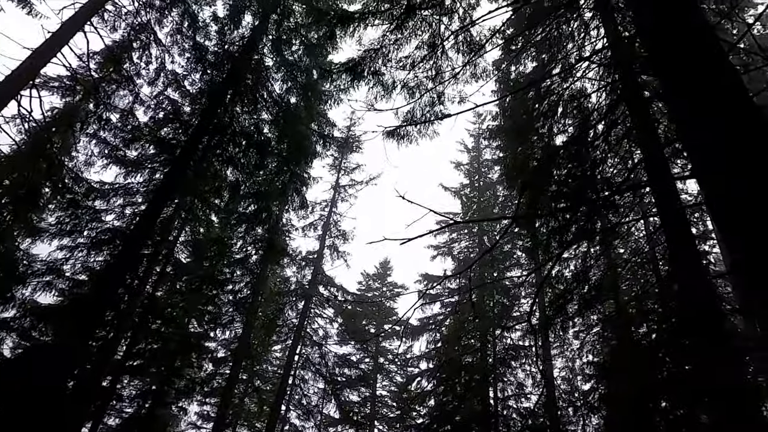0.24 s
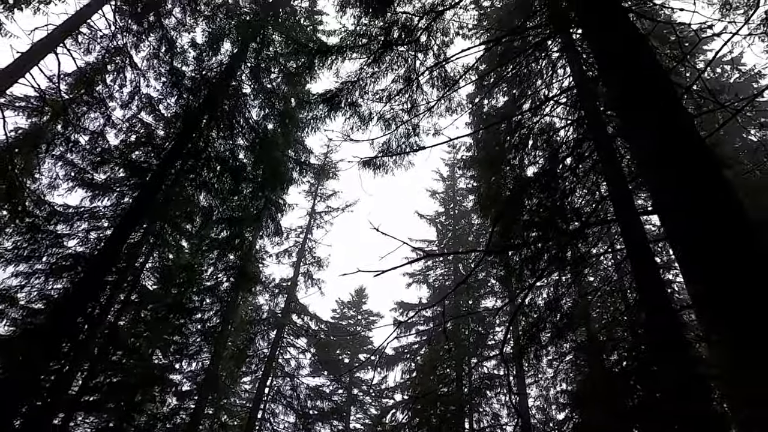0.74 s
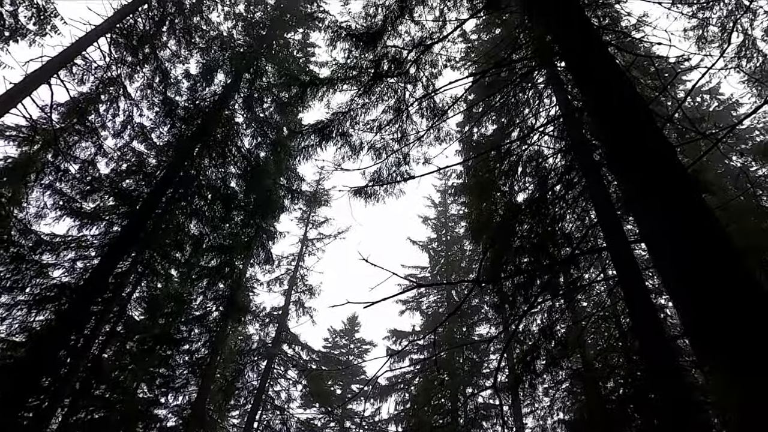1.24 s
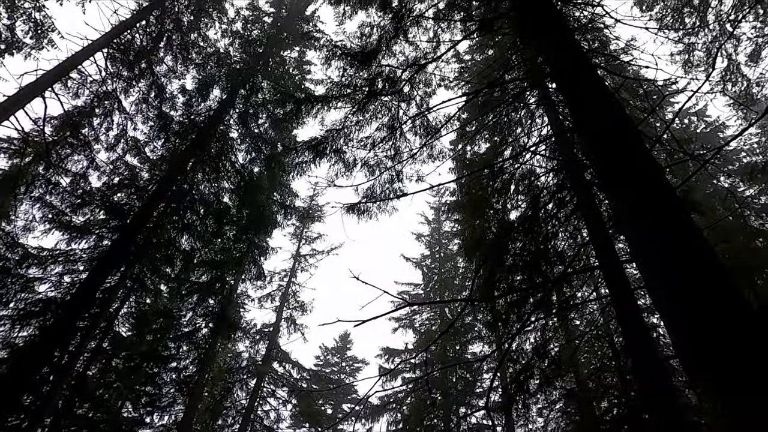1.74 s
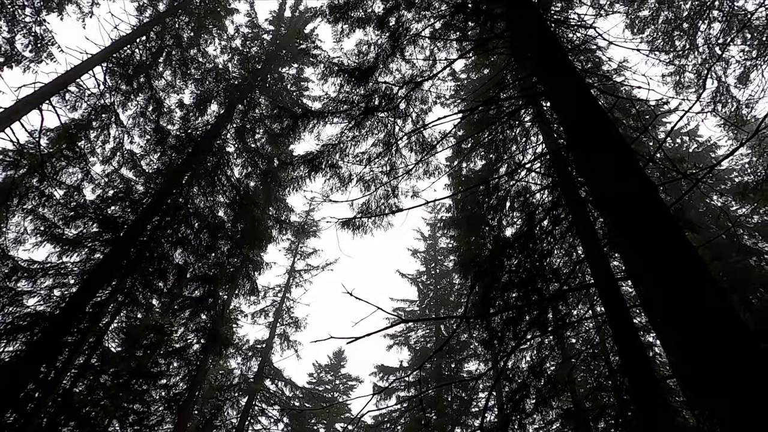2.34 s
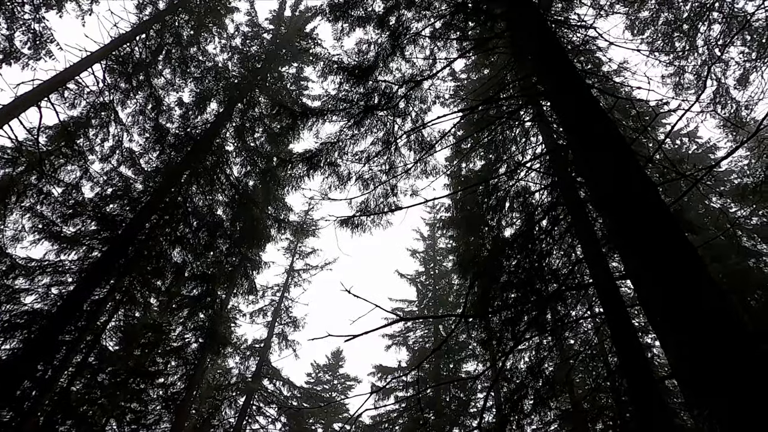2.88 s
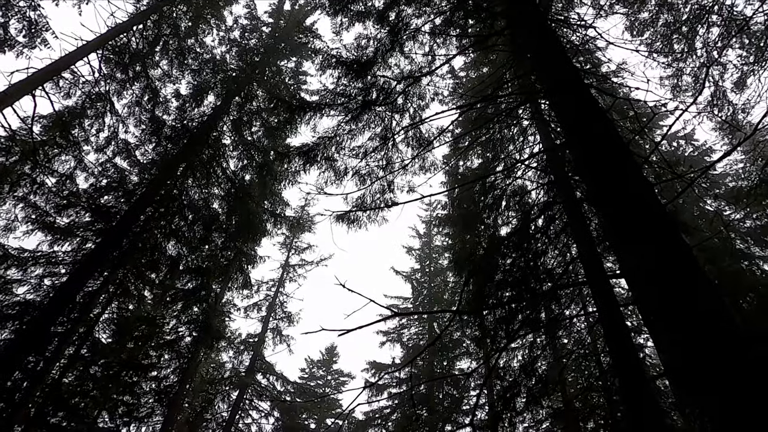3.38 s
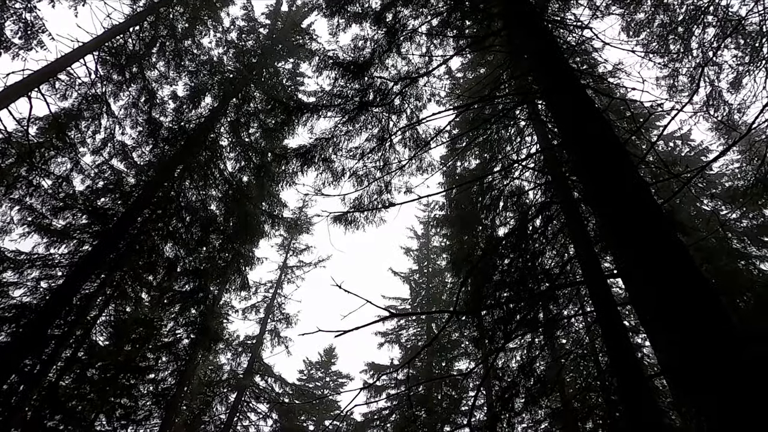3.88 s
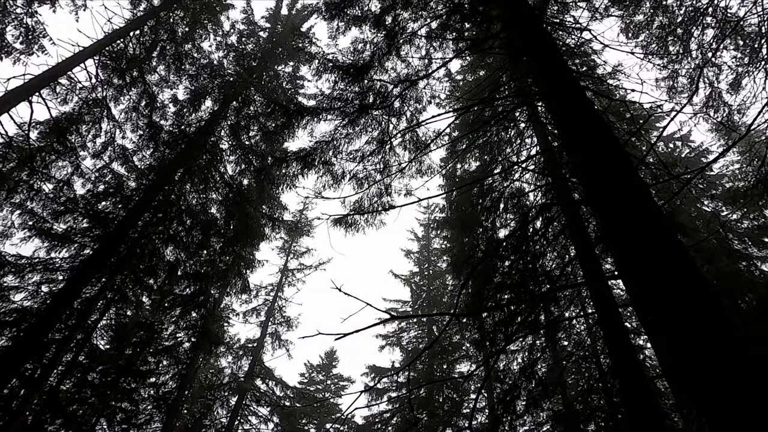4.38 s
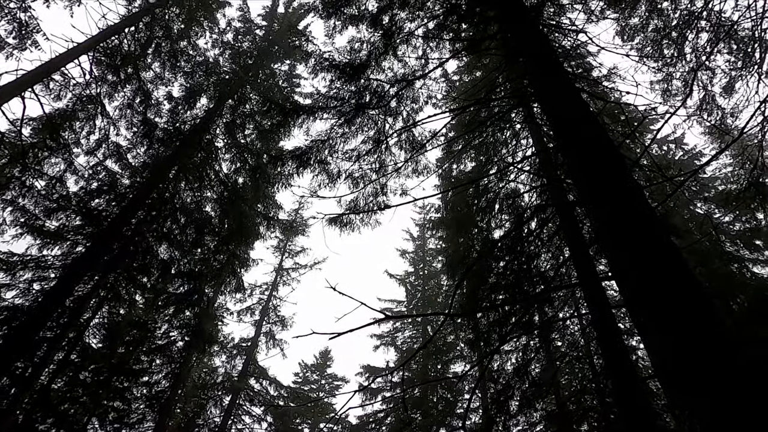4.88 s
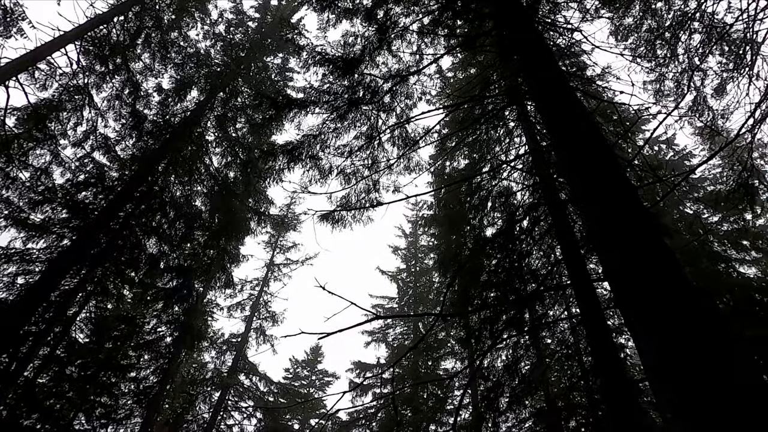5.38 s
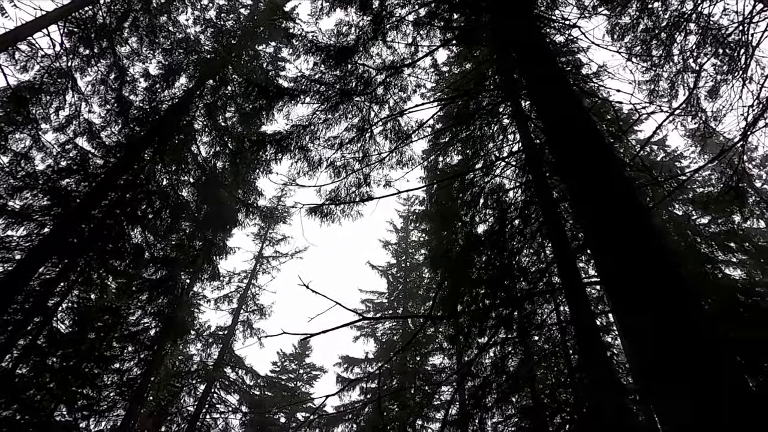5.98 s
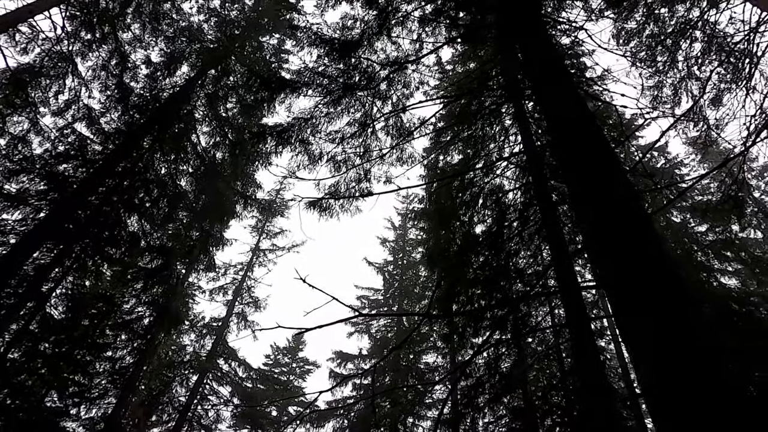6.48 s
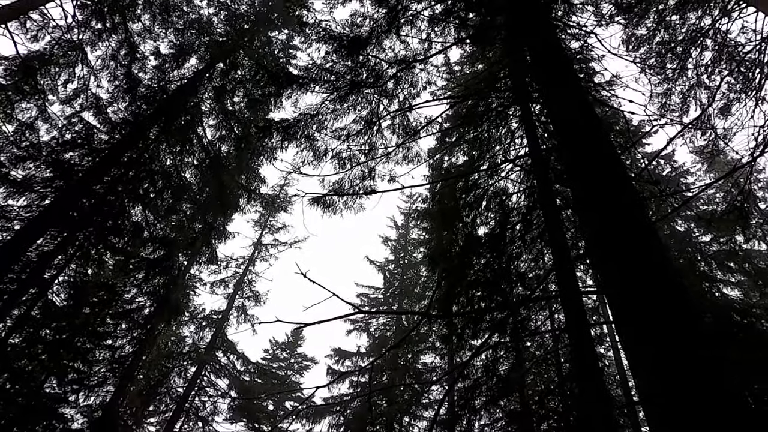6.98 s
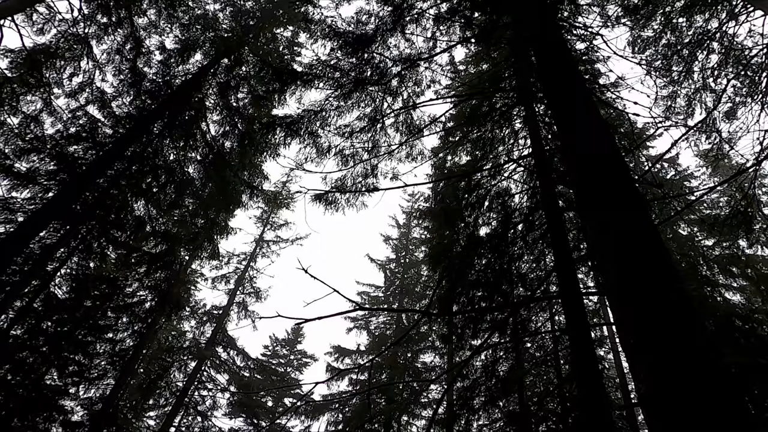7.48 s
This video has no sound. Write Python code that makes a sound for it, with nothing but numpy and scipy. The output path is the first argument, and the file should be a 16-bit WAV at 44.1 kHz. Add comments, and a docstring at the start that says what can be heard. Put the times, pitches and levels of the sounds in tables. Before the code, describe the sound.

In a quiet conifer forest, heard through a hand-held camera's microphone, the first half second is close handling: a firm hollow knock at 0.12 s, smaller bumps, grip creaks, scratchy sleeve and a little low rumble. Behind lies a very faint rush of boughs with sparse, thin, falling whistles. A soft knock and scuff come at 1.05 s, a stronger knock at 1.8 s, and tiny dry twig ticks at 1.7, 1.9, 2.6, 3.0 and 3.3 s. From about 2.4 s whistles thicken, and between 3 and 3.6 s the wind rises sharply into a high, airy hiss centred around 3.5-4.5 kHz, fluttering with short gliding whistles and growing slightly until the end at 7.7 s. Hand knocks and a soft broad slide occur around 5.5-5.9 s. At 7.39 s a loud, sharp camera click snaps with a short woodland echo; the hiss continues.

```python
"""Needles in tall spruce tops whistle as the wind rises: single thin glides crowd into a high hiss.
Each whistle is a sine gliding through an eddy's arch; far needles and boughs are fluttering coloured noise.
Close by, a sleeve rustles in scratchy clicks, and fingers knock and slide on a hand-held camera's case.
Twigs tick, and the camera clicks sharply near the end: short pushes through decaying modes."""
import sys
import numpy as np
from scipy import signal
from scipy.fft import rfft, irfft, next_fast_len
from scipy.io import wavfile
from scipy.ndimage import uniform_filter1d

SR = 44100
rng = np.random.default_rng(int(sys.argv[2]) if len(sys.argv) > 2 else 0)


def materialize(psi):
    """Save the field psi as 16-bit PCM at rate SR to the path in sys.argv[1].

    A 1-D psi becomes a single channel; in a 2-D psi each row is a channel.
    """
    bounded = np.clip(np.atleast_2d(psi).T, -1, 1)
    quanta = np.round(bounded * 32767).astype(np.int16)
    wavfile.write(sys.argv[1], SR, quanta)


N = 340893

# Wind lulls, then rises; reference level for needles and boughs: time_s, gust_db
GUST = [(0.0, -64), (0.6, -73), (1.3, -66), (2.39, -63), (2.98, -57.5), (3.57, -43.5), (7.73, -38.5)]
# Rush of the boughs against the gust: gust_db, bough_level_db
BOUGH_LAW = [(-75.5, -63.5), (-64.5, -60.5), (-57.5, -55), (-40.5, -51)]
# Puffs through single crowns: middle_s, length_s, added_hiss_db (relative to the gust)
PUFFS = [(5.14, 0.13, -12.5), (6.12, 0.3, -17.5), (6.77, 0.079, -8.5), (7.19, 0.166, -10.5)]
# Finest needles set hissing higher by the gust front: middle_s, length_s, level_db
FINE_PUFFS = [(3.55, 0.13, -67.5), (3.95, 0.145, -56.5), (4.27, 0.19, -63), (4.9, 1, -58)]
# Relative spectrum shapes: frequency_hz, density_db (per Hz)
NEEDLE_COLOUR = [(1800, -39.5), (2400, -14.5), (3000, -7), (3700, -2), (4500, -4), (5200, -11), (6200, -20),
                 (7800, -31), (9000, -42), (14000, -68.5)]
FINE_COLOUR = [(3500, -25), (5000, 2), (5800, 7.5), (7000, -9.5), (8500, -32.5), (14000, -60)]
BOUGH_COLOUR = [(25, -31), (85, -82.5), (120, -12), (170, 1.5), (500, 1), (800, 3), (1200, 5), (2000, 1.5),
                (4500, -8.5), (6500, -17.5), (8400, -27), (9500, -24.5), (12000, -32.5), (14000, -53)]
SLIDE_COLOUR = [(70, -39), (170, -2), (450, 4), (630, -1.5), (950, 8), (1280, 9.5), (2000, 7), (4000, 4),
                (7000, -3.5), (8700, -13.5), (10500, -17), (13000, -28), (15000, -41)]
RUMBLE_COLOUR = [(20, -15), (35, 1.5), (60, -5), (120, -4), (190, -3.5), (400, -56.5)]
# Nearby sprays: start_s, length_s, pitch_hz, glide (share of pitch), arch (share of pitch), level_db
WHISTLES = [(0, 0.13, 4388, -0.106, 0.013, -70), (.185, .12, 3936, -.22, 0.017, -72.5),
            (.52, 0.087, 3080, -.08, 0.012, -78), (.698, 0.161, 4044, -0.02, 0.185, -72),
            (1.21, 0.13, 3874, 0, -0.0089, -75.5), (1.365, 0.044, 5300, -0.084, 0.024, -73.5),
            (1.396, 0.12, 4220, -.14, 0.039, -68.5), (1.675, 0.063, 3162, 0.01, 0.037, -68.5),
            (1.95, 0.125, 3674, 0.065, 0.065, -62), (2.047, 0.079, 4427, -0.18, 0.067, -68.5),
            (2.096, 0.0536, 3397, -0.016, -0.0064, -68), (2.361, 0.12, 3970, -0.027, 0.016, -67),
            (2.372, 0.079, 3230, -0.212, 0.07, -64), (2.412, 0.047, 4690, -0.048, 0.0063, -65),
            (2.462, 0.059, 4400, -0.068, 0.0029, -65.5), (2.635, 0.115, 4670, -0.015, -0.02, -61),
            (2.725, .07, 3850, -0.069, -0.015, -63.5), (2.915, 0.0735, 3275, -0.044, 0.022, -57.5),
            (2.905, 0.14, 6320, 0.064, 0.0097, -67), (3.02, 0.136, 3536, -0.062, 0.021, -52),
            (3.072, 0.049, 4000, -0.047, -0.0053, -48), (3.108, 0.056, 3955, -0.13, -0.011, -48),
            (3.12, 0.04, 4770, -0.053, -0.001, -58), (3.15, .05, 3753, -.07, -0.015, -45),
            (3.185, 0.078, 3620, 0.017, 0, -56), (3.19, 0.145, 4467, -0.068, -0.0085, -56.5),
            (3.461, 0.12, 3340, 0.107, -0.032, -51.5), (3.47, 0.08, 6370, .06, -0.0022, -68),
            (3.516, 0.1136, 3806, -0.125, -0.026, -48.5), (3.52, 0.092, 5350, 0.018, 0.034, -57.5),
            (3.6, 0.129, 3735, -0.013, 0.017, -48), (3.68, 0.1223, 3623, -0.0244, 0.0184, -41),
            (3.855, 0.1355, 3531, -0.084, 0.09, -44.5), (4.0, 0.084, 5436, 0.0049, -0.028, -55),
            (4.1, 0.077, 3772, 0.125, 0, -52.5), (4.145, 0.078, 4350, -0.106, 0.172, -55.5),
            (4.31, 0.063, 4490, 0.043, -0.0084, -49.5), (4.435, 0.06, 3714, 0.049, 0.0022, -51),
            (4.49, 0.08, 4870, -0.172, 0.001, -53), (4.725, 0.104, 3700, -0.0236, -0.00091, -43),
            (4.765, .08, 8170, 0.0094, 0.03, -71), (4.94, 0.074, 3454, 0.089, -0.039, -47),
            (4.949, .085, 4575, 0.119, .015, -51.5), (5.09, 0.096, 3666, 0.0083, -0.0086, -48.5),
            (5.17, 0.047, 4750, -0.049, -0.0062, -55), (5.22, 0.141, 3910, -0.095, -0.014, -45),
            (5.395, 0.039, 9250, -0.035, -0.022, -68), (5.565, 0.138, 3820, -.13, 0.0041, -47),
            (5.6, 0.071, 5220, 0.105, -0.0073, -51), (5.83, 0.04, 4304, -0.19, 0.033, -46.5),
            (5.989, 0.107, 4674, -0.119, 0.015, -48.5), (6.06, 0.145, 3622, -0.049, 0.017, -46),
            (6.12, 0.0784, 4416, 0.102, 0.0022, -44), (6.135, 0.12, 3345, 0.144, 0.008, -48),
            (6.26, 0.051, 8670, -0.085, 0.0084, -71), (6.41, 0.0764, 3788, 0.12, 0.025, -43.5),
            (6.49, 0.094, 3667, 0.07, -0.034, -43.5), (6.56, 0.09, 4173, 0.063, 0.0048, -48.5),
            (6.88, 0.059, 7930, -0.049, 0.011, -65), (6.92, 0.071, 3445, -0.0031, -0.013, -48.5),
            (7.105, 0.109, 4387, 0.096, 0.014, -44.5), (7.53, 0.0737, 3568, 0.09, -0.0099, -45),
            (7.62, 0.11, 3620, -0.167, 0.0062, -45.5)]
# Whole branches stirred by an eddy: start_s, length_s, pitch_hz, spread (share of pitch), level_db
FLURRIES = [(1.328, 0.145, 4770, 0.109, -69.5), (1.9, 0.084, 4600, 0.109, -67.5),
            (2.554, 0.198, 4422, 0.096, -58), (2.701, 0.205, 4294, 0.123, -60.5),
            (2.851, 0.183, 3069, 0.0915, -57), (3.039, .2, 4146, .12, -52.5), (3.189, .26, 4448, .11, -54),
            (3.389, 0.191, 3149, 0.088, -51)]
# Sleeve as the camera is raised: middle_s, length_s, level_db
RUSTLES = [(.165, 0.079, -62), (.27, 0.126, -64), (.42, 0.098, -67)]
# Hand sliding on the case: middle_s, length_s, level_db
SLIDES = [(0.1695, 0.179, -65), (0.404, 0.048, -63.5), (1.051, 0.5, -66), (5.736, 1, -48),
          (5.59, 0.111, -52.5)]
# Skin sticking and slipping as the grip tightens, before the high-pass: middle_s, length_s, level_db
SQUEEZES = [(.122, 0.0208, -42.5), (.25, 0.158, -56.5)]
# Camera jolts as it is swung upward: middle_s, level_db
JOLTS = [(.03, -72), (.18, -59.5), (.5, -66.5), (.71, -73.5), (.92, -70), (1.85, -64.5)]
# Knocks on the case, before the high-pass: start_s, peak_db, push_hz, abruptness (0-2)
KNOCKS = [(.056, -46.5, 298, 0.62), (.115, -40.5, 420, 0.8), (.120, -19, 928, 0.198),
          (.133, -40, 1000, 0.62), (.165, -38, 420, 0.46), (.177, -42.5, 450, 1), (.219, -37, 597, 0.55),
          (.242, -49, 640, 0.44), (.256, -48, 520, 0.43), (.271, -46.5, 603, 0.7), (.361, -43, 450, 0.304),
          (1.046, -31, 660, 0.523), (1.052, -41, 900, 0.96), (1.787, -22, 762, 0.577), (2.472, -45, 318, 1),
          (5.512, -33.5, 313, 0.71), (5.568, -25.5, 848, 0.64), (5.624, -29.5, 450, 0.81),
          (5.633, -35, 700, 0.37), (5.815, -35, 235, 0.414), (5.826, -43.5, 237, 0.91),
          (7.393, -27, 348, 0.56), (7.402, -37, 346, 0.275)]
# Twig ticks, then the camera's sharp click (last two rows), before high-pass and echo:
# start_s, peak_db, push_hz, abruptness (0-2)
TICKS = [(.054, -53, 6500, 0.19), (.122, -44.5, 4970, 0.68), (.177, -46, 2330, 0.15),
         (1.681, -46.5, 5440, 0.226), (1.925, -48, 5950, 0.235), (2.561, -47.5, 5400, 0.58),
         (3.026, -43, 6740, 0.364), (3.305, -48.5, 7730, 0.73), (7.3927, -12.5, 3665, 0.87),
         (7.3938, -21.5, 3300, 0.61)]
# Modes of the case, and of the ticks and click: frequency_hz, relative_db, t60_s (before the choke)
CASE_MODES = [(254, 10, 0.0052), (450, 16, 0.00688), (640, 3, 0.0773), (807, -2, 0.0143), (1061, -4, 0.031),
              (1177, -7, 0.058), (1304.4, 9.5, 0.0274), (1983, -4, 0.05)]
TICK_MODES = [(2780, 10, 0.00336), (3550, 8, 0.0044), (6000, 3.5, 0.00183), (7727, 2, 0.00397)]

FLUTTER_DB, FLUTTER_PER_S = 0.7571, 14  # random surge and sag of the hiss
CREST_SKEW = 0.6485  # below 1: an eddy speeds up faster than it dies, so the arch crests early
STRAND_S, FLURRY_ATTACK_S, FLURRY_RELEASE_S = 0.04, 0.01, 0.048
JOLT_LENGTH_S, CHOKE_S = 0.1274, 0.026


def undb(db):
    """Decibels to gain."""
    return 10 ** (np.asarray(db) / 20)


def unit(x):
    """Scale to an rms of one."""
    return x / np.sqrt(np.mean(x ** 2))


def butter(x, order, hz, kind):
    """Butterworth filter."""
    return signal.sosfilt(signal.butter(order, hz, kind, fs=SR, output="sos"), x)


def curve(rows):
    """Rows of (time_s, value) joined by straight lines."""
    return np.interp(np.arange(N) / SR, *np.transpose(rows))


def colour_db(points, hz):
    """Read a spectrum on a log-frequency axis."""
    point_hz, db = np.transpose(points)
    return np.interp(np.log(np.maximum(hz, 1)), np.log(point_hz), db)


def walk(rate_per_s, size=N):
    """Smooth random wandering with a spread near one."""
    k = max(int(SR / rate_per_s), 2)
    steps = np.repeat(rng.standard_normal(size // k + 2), k)
    smooth = uniform_filter1d(uniform_filter1d(steps, k), k)
    return np.sqrt(2) * smooth[:size]


def add(out, start_s, sound):
    """Mix a sound in at a time, cutting what falls outside."""
    i = int(start_s * SR)
    lo, hi = max(i, 0), min(i + len(sound), len(out))
    if hi > lo:
        out[lo:hi] += sound[lo - i:hi - i]


def swells(events):
    """A bell of gain per (middle_s, length_s, level_db); length is taken at half height."""
    t = np.arange(N) / SR
    gain = np.zeros(N)
    for middle_s, length_s, db in events:
        octaves_down = np.minimum((2 * (t - middle_s) / length_s) ** 2, 20)
        gain += undb(db) * np.exp2(-octaves_down)
    return gain


def turbulence(points, flicker_db, flicker_per_s, count=18):
    """Coloured noise whose half-octave bands each flutter in level."""
    size = next_fast_len(N, True)
    hz = np.arange(size // 2 + 1) * SR / size
    spectrum = rfft(rng.standard_normal(size)) * undb(colour_db(points, hz))
    band = np.clip(2 * np.log2(np.maximum(hz, 1) / 32), 0, count - 1).astype(int)
    out = np.zeros(N)
    for k in range(count):
        noise = irfft(spectrum * (band == k), size)[:N]
        out += noise * undb(flicker_db * walk(flicker_per_s))
    return unit(out)


def forest(x, wet_db, t60_s, build_s=0.073):
    """Trunks scatter a thin echo that builds up, then fades."""
    t = np.arange(SR) / SR
    echo = rng.standard_normal(SR) * undb(-60 * t / t60_s) * (1 - np.exp(-t / build_s))
    return x + undb(wet_db) * signal.fftconvolve(x, echo / np.linalg.norm(echo))[:N]


def boughs(gust_db):
    """The rush of the boughs grows with the wind more slowly than the needles' hiss."""
    level_db = np.interp(gust_db, *np.transpose(BOUGH_LAW))
    return undb(level_db) * turbulence(BOUGH_COLOUR, flicker_db=1.3, flicker_per_s=13)


def sleeve(catches_per_s=900, low_hz=1600, high_hz=3000):
    """Threads of cloth catch and let go in a scratchy run of tiny clicks."""
    catches = (rng.random(N) < catches_per_s / SR) * rng.standard_normal(N) * undb(2 * walk(59.9))
    scratch = butter(catches, 3, [low_hz, high_hz], "bandpass")
    return swells(RUSTLES) * unit(scratch)


def ring(modes):
    """Fading tones of a struck object, choked soon after by whatever holds it."""
    t = np.arange(SR // 8) / SR
    choke = np.exp(-(t / CHOKE_S) ** 3)
    tones = sum(undb(db - 60 * t / t60_s) * np.sin(2 * np.pi * hz * t) for hz, db, t60_s in modes)
    return choke * tones


def blows(events, modes):
    """Each short push rings the modes near its own speed: soft ones few, abrupt ones a wide range."""
    out = np.zeros(N)
    for start_s, peak_db, push_hz, abruptness in events:
        ratio = 1 + max(abruptness, 0.05)
        edges_hz = [push_hz / ratio, min(push_hz * ratio, SR / 2 - 100)]
        sound = butter(ring(modes), 2, edges_hz, "bandpass")
        add(out, start_s, undb(peak_db) * sound / np.abs(sound).max())
    return out


def creaks(slips_per_s=2500):
    """Skin sticks and slips in random impulses that ring the case."""
    slips = (rng.random(N) < slips_per_s / SR) * rng.standard_normal(N) * undb(2 * walk(42))
    slips = butter(slips, 2, [380, 800], "bandpass")  # soft skin wakes mainly the low modes
    return swells(SQUEEZES) * unit(signal.fftconvolve(slips, ring(CASE_MODES))[:N])


def hand():
    """Knocks, creaks, sliding skin and low rumble reach the microphone through the case."""
    slide = swells(SLIDES) * turbulence(SLIDE_COLOUR, flicker_db=1.5, flicker_per_s=27)
    shake = turbulence(RUMBLE_COLOUR, flicker_db=3, flicker_per_s=12)
    jolts = swells([(middle_s, JOLT_LENGTH_S, db) for middle_s, db in JOLTS])
    # the microphone passes little of the case's deepest notes
    contact = butter(blows(KNOCKS, CASE_MODES) + creaks(), 2, 120, "highpass")
    return contact + slide + jolts * shake


def ticks_and_click():
    """Short pushes ring twig ticks and the camera's click, low notes filtered out; an echo follows."""
    snaps = butter(blows(TICKS, TICK_MODES), 6, 2150, "highpass")
    return forest(snaps, wet_db=-10.5, t60_s=0.13)


def whistle(length_s, hz, glide, arch, waver=0.00421):
    """Vortices shed by a needle: pitch follows an eddy's speed in an arch; high notes waver more."""
    size = max(int(length_s * SR), 64)
    u = np.linspace(-1, 1, size)
    rise = ((1 + u) / 2) ** CREST_SKEW
    contour = 1 + glide * u / 2 + arch * 4 * rise * (1 - rise)
    unrest = waver * hz / 4000 * walk(500, size)
    phase = 2 * np.pi * np.cumsum(hz * contour * (1 + unrest)) / SR
    swell = np.sqrt(1 - u ** 2) * (1 - u ** 8)
    return unit(np.sin(phase) * swell * undb(2 * walk(90, size)))


def needle_swarm(gust_db, calm_per_s=170, gust_per_s=280, eddy_glide=0.03542, own_glide=0.05873, count=2200):
    """Short whistles: even, mostly falling in light air; in the gust some stand out. Eddies bend all."""
    rate_per_s = np.interp(gust_db, [-64, -42], [calm_per_s, gust_per_s])
    scatter_db = np.interp(gust_db, [-58, -44], [1.5, 3.2])
    trend = np.interp(gust_db, [-50, -42], [-0.06, 0]) + eddy_glide * walk(12)
    waver = np.interp(gust_db, [-60, -42], [0.008, 0.0075])
    pitches_hz = np.arange(2400, 7000, 10)
    share = np.cumsum(undb(colour_db(NEEDLE_COLOUR, pitches_hz)))
    share = share / share[-1]
    out = np.zeros(N)
    uniform_draws, normal_draws = rng.random((count, 4)), rng.standard_normal((count, 3))
    for (when, chance, pick, span), (slope, bend, strength) in zip(uniform_draws, normal_draws):
        i = int(when * N)
        if chance * count * SR / N > rate_per_s[i]:  # thin the candidates to the wanted rate
            continue
        hz = np.interp(pick, share, pitches_hz)
        length_s = 0.03 + 0.05 * span
        arch = 0.01551 + 0.025186 * bend
        tone = whistle(length_s, hz, trend[i] + own_glide * slope, arch, waver[i])
        # the thickest and thinnest needles sing more weakly
        db = scatter_db[i] * np.clip(strength, -2, 1.4) + 1.05 * colour_db(NEEDLE_COLOUR, hz)
        add(out, i / SR - length_s / 2, tone * undb(db) / np.sqrt(rate_per_s[i]))
    return unit(out)


def spray(length_s, hz, glide, arch, spread, neighbour_db, count=3):
    """One eddy crosses needles of unlike thickness: rougher whistles glide beside the main one."""
    neighbours = 0
    for thinness, slope in rng.uniform(-1, 1, (count, 2)):
        pitch_hz = hz * np.exp(spread * thinness)
        neighbours = neighbours + whistle(length_s, pitch_hz, glide + spread * slope, arch, waver=0.01378)
    return unit(whistle(length_s, hz, glide, arch) + undb(neighbour_db) * neighbours)


def flurry(length_s, hz, spread, glide=-0.0598, own_glide=0.0998, waver=0.01566, count=44):
    """Dozens of brief, ragged whistles overlap under a quick onset and a slower fade."""
    t = np.arange(int(length_s * SR)) / SR
    out = np.zeros(len(t))
    places = (np.arange(count) + rng.random(count)) / count
    for when, (thinness, slope, bend) in zip(places, rng.standard_normal((count, 3))):
        pitch_hz = hz * np.exp(spread * np.clip(thinness, -2, 2))
        strand = whistle(STRAND_S, pitch_hz, glide + own_glide * slope, 0.02006 * bend, waver)
        add(out, when * length_s - STRAND_S / 2, strand)
    attack = np.minimum(t / FLURRY_ATTACK_S, 1)
    release = np.minimum((length_s - t) / FLURRY_RELEASE_S, 1)
    return unit(out * attack * release)


def near_whistles():
    """Each eddy glides a nearby spray through its own arch, or stirs a whole branch into a flurry."""
    out = np.zeros(N)
    for start_s, length_s, hz, glide, arch, db in WHISTLES:
        sound = spray(length_s, hz, glide, arch, spread=0.07, neighbour_db=-9.5)
        add(out, start_s, undb(db) * sound)
    for start_s, length_s, hz, spread, db in FLURRIES:
        add(out, start_s, undb(db) * flurry(length_s, hz, spread))
    return out


def crowns(gust_db, far_breadth=0.945):
    """Near whistles stand out of the swarm; the farthest merge into a smooth, broader hiss."""
    hiss_db = gust_db + 20 * np.log10(1 + swells(PUFFS)) + FLUTTER_DB * walk(FLUTTER_PER_S)
    far_colour = [(hz, far_breadth * db) for hz, db in NEEDLE_COLOUR]
    far = turbulence(far_colour, flicker_db=0.7, flicker_per_s=23)
    swarm = needle_swarm(gust_db) + undb(-0.3) * far
    # in light air most needles stay silent
    onset_db = np.interp(hiss_db, [-61, -47], [-9.8, -4.6])
    fine = swells(FINE_PUFFS) * turbulence(FINE_COLOUR, flicker_db=4.5, flicker_per_s=25)
    return near_whistles() + undb(hiss_db + onset_db) * swarm + fine


def scene():
    """One gust drives the boughs and whistling crowns above; ticks, click and handling are close by."""
    gust_db = curve(GUST)
    whistling = forest(crowns(gust_db), wet_db=-10, t60_s=0.6)
    return (boughs(gust_db) + sleeve() + hand() + ticks_and_click() + whistling)[None]


def record(dry):
    """The camera cuts the treble steeply above 14 kHz."""
    return signal.sosfilt(signal.ellip(8, 0.2, 70, 14000, fs=SR, output="sos"), dry)


dry = scene()
out = record(dry)
materialize(out)
```